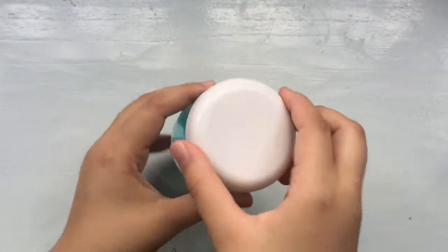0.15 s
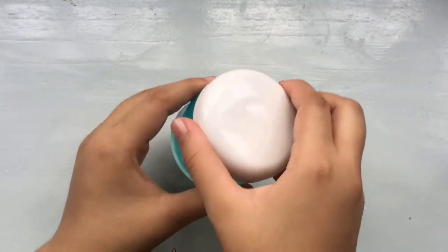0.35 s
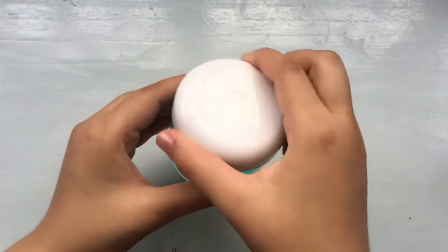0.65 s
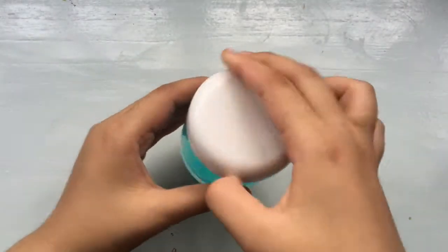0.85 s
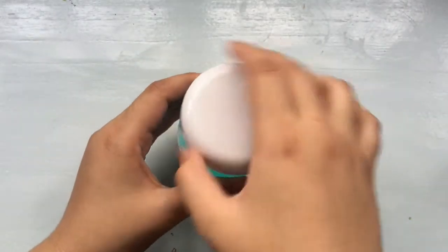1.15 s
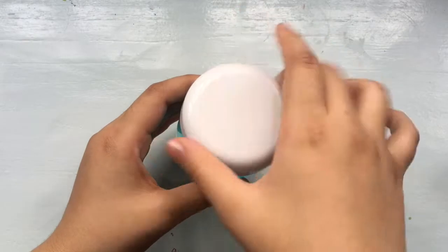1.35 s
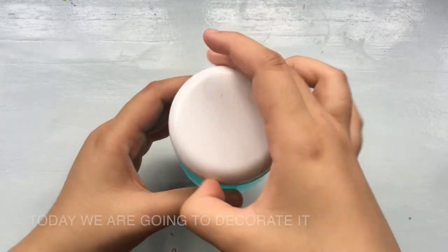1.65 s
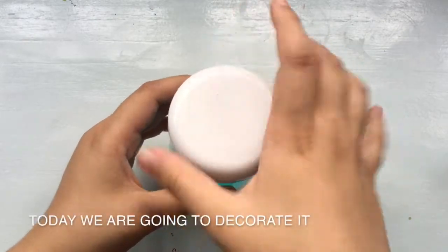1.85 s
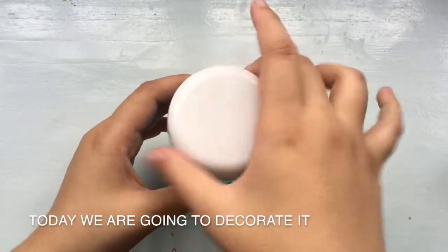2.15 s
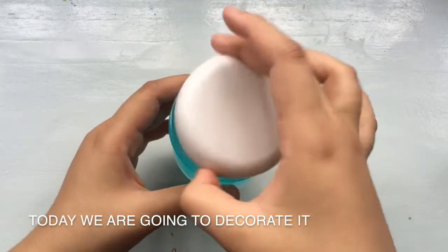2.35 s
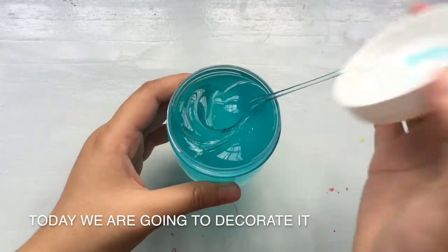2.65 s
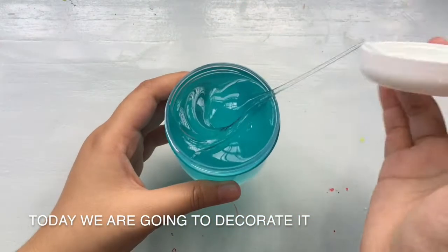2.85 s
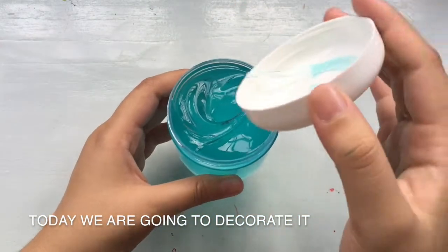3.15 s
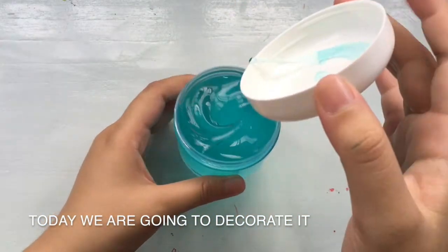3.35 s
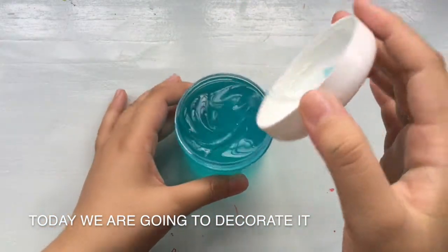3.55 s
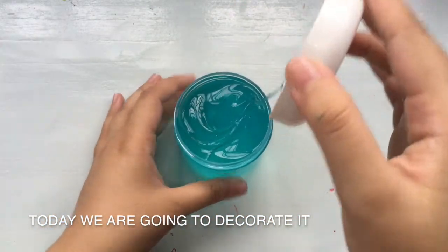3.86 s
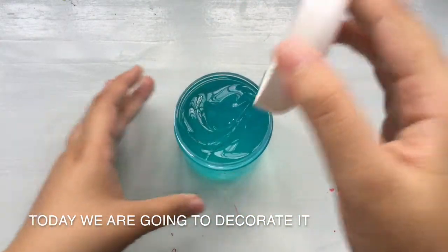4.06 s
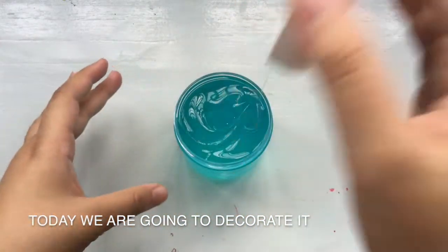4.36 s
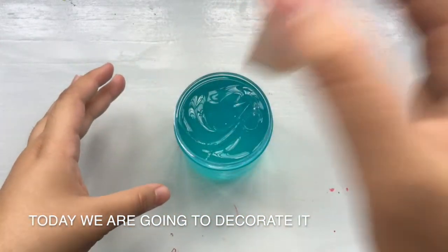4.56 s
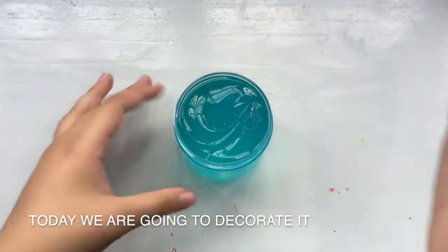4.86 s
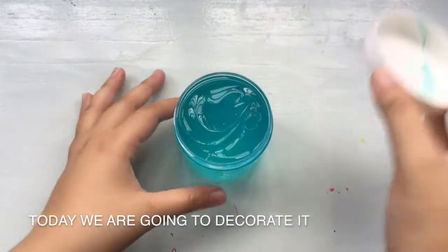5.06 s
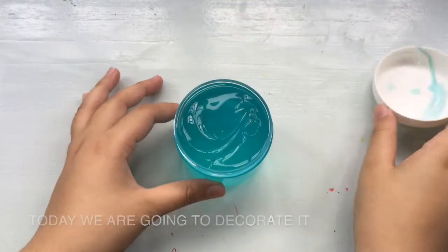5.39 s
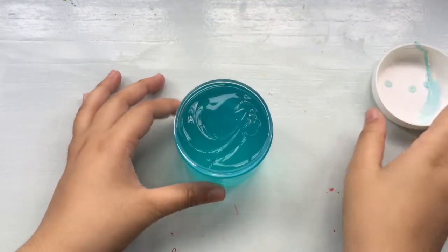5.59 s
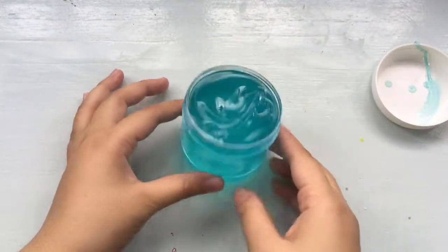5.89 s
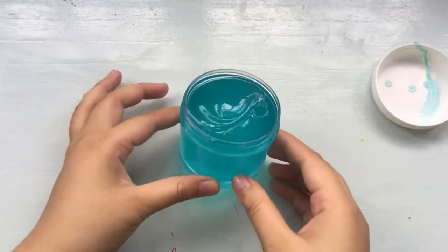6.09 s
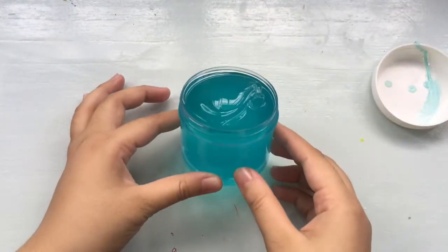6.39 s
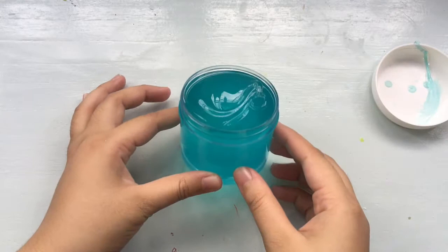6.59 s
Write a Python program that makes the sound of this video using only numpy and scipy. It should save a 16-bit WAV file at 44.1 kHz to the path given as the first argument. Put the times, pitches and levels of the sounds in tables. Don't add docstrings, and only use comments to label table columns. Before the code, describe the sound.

A low, steady motor hum and faint air noise lie under close handling sounds. Fingers barely rustle on plastic, then a jar thread catches with light hollow clicks and brief scratches over about a second and a half. One strong jar knock booms on the table, a softer one follows. After near quiet, the lid lands with a bright clack, shuffles, knocks again, and two dull bumps end it.

```python
import sys
import numpy as np
from scipy import signal
from scipy.fft import rfft, irfft
from scipy.io import wavfile
from scipy.ndimage import uniform_filter1d

SR = 44100
rng = np.random.default_rng(int(sys.argv[2]) if len(sys.argv) > 2 else 0)


def boost(x):
    u = np.asarray(x, float) / 20
    return 10 ** u


def generate_wav(sig):
    pcm = np.round(np.clip(np.atleast_2d(sig).T, -1, 1) * 32767).astype(np.int16)
    wavfile.write(sys.argv[1], SR, pcm)


N = 296793
T = np.arange(N) / SR


def rms_one(x):
    return x / np.sqrt(np.mean(x ** 2) + 1e-20)


def coloured_noise(points):
    hz = np.arange(N // 2 + 1) * SR / N + 1
    point_hz, point_db = np.array(points).T
    gain = boost(np.interp(np.log(hz), np.log(point_hz), point_db))
    spectrum = rfft(rng.standard_normal(N)) * gain
    return irfft(spectrum, N) / np.sqrt(np.mean((gain * (hz > 220)) ** 2))


def resonance(x, hz, width_hz):
    r = np.exp(-np.pi * width_hz / SR)
    top = [(1 - r * r) / 2, 0, (r * r - 1) / 2]
    return signal.lfilter(top, [1, -2 * r * np.cos(2 * np.pi * hz / SR), r * r], x)


def ring(x, hz, t60_s):
    r = boost(-60 / (t60_s * SR))
    w = 2 * np.pi * hz / SR
    return signal.lfilter([0, np.sin(w)], [1, -2 * r * np.cos(w), r * r], x + 1e-18)


def cut(x, hz, kind):
    return signal.sosfilt(signal.butter(2, min(hz, 0.45 * SR), kind, fs=SR, output="sos"), x)


def add(out, start_s, x):
    at = round(start_s * SR)
    out[at:at + len(x)] += x[:N - at]


# (pitch_hz, width_hz, level_db)
LID_SHELL = [(1750, 500, -2), (2330, 160, 4), (2750, 450, 0), (3750, 700, 1), (5800, 800, 1),
             (6900, 1100, -2), (8800, 1600, -1), (11500, 3000, -8), (14500, 3000, -12)]


def lid_body(force, body_hz, mids_db, highs_db, size):
    broad = cut(cut(force, 480, "high"), 1.26 * body_hz, "low")
    body = cut(resonance(force, body_hz, 0.2 * body_hz) + 0.37 * broad, 3500, "low")
    shell = []
    for k, (pitch_hz, width_hz, level_db) in enumerate(LID_SHELL):
        gain = boost(level_db + rng.normal(0, 2))
        shell.append((-1) ** k * gain * resonance(force, pitch_hz, width_hz))
    mids = cut(sum(shell[:4]), 6000, "low")
    highs = cut(sum(shell[4:]), 4500, "high")
    return body / size(body) + boost(mids_db) * mids / size(mids) + boost(highs_db) * highs / size(highs)


# (start_s, peak_db,
# body_hz, mids_db, highs_db)
CATCHES = [(0.932, -35.5, 1000, 0, -16), (0.998, -46, 860, -25, -21), (1.053, -37, 940, -13, -14),
           (1.07, -36.5, 1650, -11, -26), (1.174, -46.5, 694, -7, -19), (1.2, -27, 1730, -27, -10),
           (1.319, -44, 953, -18, -8), (1.327, -37, 895, 3, -18), (1.426, -25.5, 975, -36, -10),
           (1.447, -43, 874, 7.5, -22), (1.457, -37, 820, -28, -7), (1.784, -48.5, 756, -23, -20),
           (1.99, -37, 1460, -37, -30), (2.109, -47, 920, -25, -22), (2.222, -40.5, 800, -24, -11),
           (2.265, -39.5, 745, -28, -9), (2.365, -42, 900, -22, -12), (5.334, -51, 1680, -8, -0.5),
           (5.372, -25, 1980, -9, -16), (5.57, -30, 1300, -3.5, -11.5)]
# (start_s, peak_db)
TAPS = [
    (0.816, -57),
    (1.415, -57),
    (1.649, -58),
    (1.731, -65),
    (3.341, -62),
    (4.439, -57),
    (6.68, -61),
]
# (body_hz, mids_db, highs_db)
TAP_BODY = (420, -13, -1.5)


def ticks():
    out = np.zeros(N)
    t = T[:SR // 20]
    taps = [(*tap, *TAP_BODY) for tap in TAPS]
    for start_s, peak_db, body_hz, mids_db, highs_db in CATCHES + taps:
        chatter_ms = max(2.17 + 0.09 * (peak_db + 40), 0.2)
        fade = np.exp(-t * 1000 / chatter_ms)
        force = rng.standard_normal(len(t)) * fade * (1 - np.exp(-t / 0.00038))
        force[8] += 6.5
        tick = lid_body(force, body_hz, mids_db, highs_db, lambda v: abs(v).max())
        add(out, start_s, boost(peak_db + 2) * tick)
    return out


# (start_s, length_s, level_db, body_hz, shell_db)
SLIDES = [(0.841, 0.12, -58, 700, -7), (0.988, 0.023, -61, 900, -13), (1.047, 0.042, -50.5, 900, -18),
          (1.191, 0.016, -42.5, 420, -30), (1.197, 0.065, -50.5, 1000, -13), (1.241, 0.042, -49.5, 2650, 1),
          (1.256, 0.031, -44, 2280, -22), (1.323, 0.013, -39.5, 1000, -13.5), (1.41, 0.034, -58, 1100, -9),
          (1.443, 0.056, -61.5, 900, 0), (1.788, 0.02, -56, 770, -13), (1.996, 0.033, -48.5, 1330, -12),
          (2.019, 0.065, -54.5, 1000, -2), (2.101, 0.039, -58, 1000, -13.5), (2.215, 0.02, -61.5, 900, -4),
          (2.265, 0.015, -54, 900, -3.5), (2.259, 0.022, -49, 443, -15), (2.362, 0.035, -54.5, 930, -0.5),
          (2.363, 0.022, -54, 450, -22)]
# (start_s, length_s, level_db, body_hz)
SETTLES = [
    (5.34, 0.046, -57.5, 1400),
    (5.374, 0.026, -42, 1020),
    (5.378, 0.086, -56, 1960),
    (5.383, 0.14, -55.5, 700),
    (5.571, 0.012, -39, 710),
]
# (mids_db, highs_db)
SETTLE_SHELL = (-42, -22)


def scrapes():
    out = np.zeros(N)
    longest = SR // 6
    slides = [(*row, row[-1] - 2) for row in SLIDES]
    settles = [(*row, *SETTLE_SHELL) for row in SETTLES]
    for start_s, length_s, level_db, body_hz, mids_db, highs_db in slides + settles:
        stroke = np.sin(np.pi * np.clip(T[:longest] / length_s, 0, 1) ** 0.71)
        unevenness_db = 3 * rms_one(cut(rng.standard_normal(longest), 400, "low")) * 20
        slips = rng.standard_normal(longest) * boost(unevenness_db / 20)
        scrape = lid_body(slips, body_hz, mids_db, highs_db, np.std)
        add(out, start_s, boost(level_db) * stroke * scrape)
    return out


# (start_s, length_s, level_db)
RUBS = [(0.1, 0.078, -88), (0.583, 0.13, -73), (0.682, 0.19, -73.5), (0.85, 0.082, -75),
        (0.966, 0.076, -75), (1.53, 0.19, -77.5), (1.709, 0.037, -72), (1.738, 0.035, -74),
        (1.77, 0.066, -78), (1.953, 0.05, -79), (2.23, 0.066, -71), (2.263, 0.15, -76.5),
        (3.782, 0.21, -83), (5.443, 0.066, -77), (5.73, 0.22, -78.5), (6.67, 0.052, -79)]
# (pitch_hz, level_db per Hz)
RUB_COLOUR = [(1180, -16), (2000, 0.5), (2360, 0), (2790, -4), (3540, -5), (6150, -10), (14700, -10.5),
              (16300, -21.5)]


def fingers():
    level = np.zeros(N)
    for start_s, length_s, level_db in RUBS:
        level += boost(level_db) * np.sin(np.pi * np.clip((T - start_s) / length_s, 0, 1) ** 1.1)
    rustle = np.zeros(N)
    for side in ("low", "high"):
        flecks = boost(3.4 * rms_one(cut(rng.standard_normal(N), 100, "low")))
        rustle += flecks * cut(coloured_noise(RUB_COLOUR), 13000, side)
    return boost(4.0) * uniform_filter1d(level, size=400) * rustle


# (start_s, peak_db, contact_cutoff_hz, crack_db)
THUDS = [
    (3.563, -45, 4040, -18.5),
    (3.564, -23.5, 1750, -26.5),
    (3.567, -40, 150, -62),
    (3.737, -35, 1530, -36.5),
    (3.741, -35.5, 279, -49),
    (5.371, -44, 900, -46),
    (5.471, -45.5, 298, -72),
    (5.570, -47, 900, -51),
    (6.264, -40, 364, -68),
    (6.274, -40.5, 220, -67),
]
# (pitch_hz, level_db, t60_s)
TABLE_MODES = [(140.4, -3.5, 0.16), (162, -4, 0.08), (198.1, -1, 0.26), (257, -8, 0.2), (358.5, -2, 0.061),
               (408.6, -14, 0.15), (414.3, -7, 0.13), (514, -5, 0.052), (607, -8, 0.11), (550, -7.5, 0.11),
               (694, -11.5, 0.12), (820, -8.5, 0.053), (900, -19, 0.089), (1043, -0.5, 0.026),
               (1290, -5, 0.0068), (1580, 2.5, 0.017)]
# (pitch_hz, width_hz, level_db)
JAR_WALL = [(1000, 780, 3.5), (1650, 550, 3.5), (2220, 135, 2), (3570, 200, 1), (4540, 610, -12.5),
            (5780, 700, -10), (7600, 1200, -21), (12000, 6000, -34)]


def table():
    out = np.zeros(N)
    click = np.eye(1, SR // 2)[0]
    t = T[:SR // 10]
    crack_fade = np.exp(-t / 0.0049) + 0.11 * np.exp(-t / 0.015)
    for start_s, peak_db, contact_cutoff_hz, crack_db in THUDS:
        boom = 0
        for k, (pitch_hz, level_db, t60_s) in enumerate(TABLE_MODES):
            gain = boost(level_db + rng.normal(0, 1))
            boom = boom + (-1) ** k * gain * ring(click, pitch_hz, t60_s)
        add(out, start_s, boost(peak_db) * cut(boom, contact_cutoff_hz, "low"))

        crack = rng.standard_normal(len(t)) * crack_fade
        wall = 0
        for k, (pitch_hz, width_hz, level_db) in enumerate(JAR_WALL):
            wall = wall + (-1) ** k * boost(level_db) * resonance(crack, pitch_hz, width_hz)
        add(out, start_s, boost(crack_db) * wall)
    return out


# (low_hz, high_hz, level_db, t60_s)
ROOM_BANDS = [(150, 460, -5, 0.22), (700, 630, -5.5, 0.46), (1300, 3300, -9.5, 0.32),
              (2460, 8400, -24.5, 0.93), (7000, 12000, -13, 0.24)]


def room(x):
    t = T[:SR // 2]
    tail = 0
    for low_hz, high_hz, level_db, t60_s in ROOM_BANDS:
        band = cut(cut(rng.standard_normal(len(t)), low_hz, "high"), high_hz, "low")
        band = band * boost(-60 * t / t60_s) * (1 - np.exp(-t / 0.0032))
        tail = tail + boost(level_db) * band * np.sqrt(14 / t60_s / SR)
    return signal.fftconvolve(x, tail)[:N]


# (pitch_hz, level_db)
HUM = (48.3, -42)
# (pitch_hz, width_hz, level_db)
DRONES = [(70.5, 19.6, -54), (92, 5.6, -58.5), (99.7, 1.44, -63.5), (109.3, 3.5, -58), (146.2, 8, -61.5),
          (199, 2.26, -63.5), (250.8, 7.9, -69.5), (328.9, 9.5, -72)]
# (time_s, level_db)
MOTOR_LOAD = [
    (0, -56),
    (0.7, -54),
    (1.8, -55),
    (3.2, -55),
    (4.2, -55.5),
    (5.5, -52.5),
    (6.0, -52.5),
    (6.73, -52),
]
# (pitch_hz, level_db per Hz)
AIR_COLOUR = [(130, -19.5), (220, -3.5), (358, -3.5), (392, -12), (551, -15), (637, -9.5), (763, -14),
              (1240, -14), (2300, -23.5), (2700, -26.5), (4970, -35.5), (9300, -41), (10500, -45.5),
              (12000, -40.5), (15800, -45), (16300, -61)]


def background():
    hum_hz, hum_db = HUM
    sound = np.sqrt(2) * boost(hum_db) * np.sin(2 * np.pi * hum_hz * T)
    load_s, load_db = np.array(MOTOR_LOAD).T
    swell = boost(np.interp(T, load_s, load_db) + 53)
    for pitch_hz, width_hz, level_db in DRONES:
        drone = resonance(rng.standard_normal(N), pitch_hz, width_hz)
        drone = rms_one(resonance(drone, pitch_hz, width_hz))
        sound += boost(level_db) * (swell if pitch_hz < 125 else 1) * drone
    low_air = cut(cut(cut(rng.standard_normal(N), 60, "high"), 45, "high"), 220, "low")
    return sound + boost(-63) * rms_one(low_air) + boost(-60) * coloured_noise(AIR_COLOUR)


def scene():
    lid = ticks() + scrapes()
    knocks = table()
    echoes = room(boost(-1.5) * lid + knocks)
    return (lid + knocks + echoes + fingers() + background())[None]


def low_pass(x):
    return signal.sosfilt(signal.butter(12, 16460, fs=SR, output="sos"), x)


def record(dry):
    steep = signal.cheby2(10, 50, 16900, fs=SR, output="sos")
    mix = signal.sosfilt(steep, dry)
    return low_pass(mix)


dry = scene()
out = record(dry)
generate_wav(out)
```